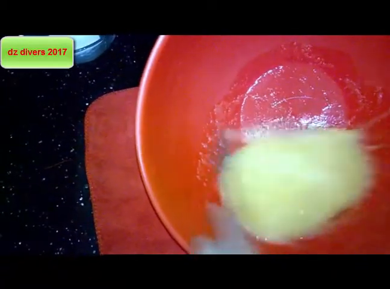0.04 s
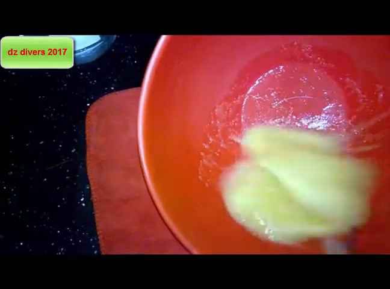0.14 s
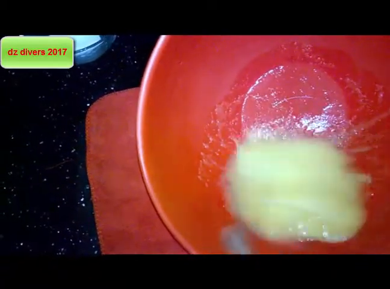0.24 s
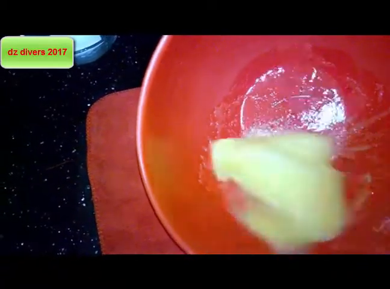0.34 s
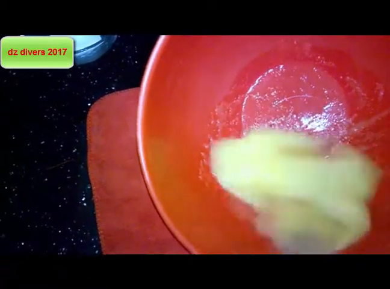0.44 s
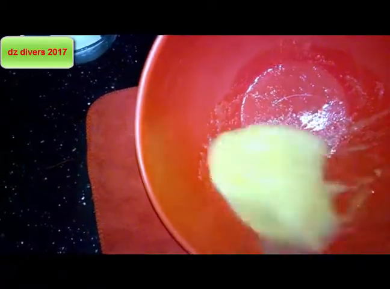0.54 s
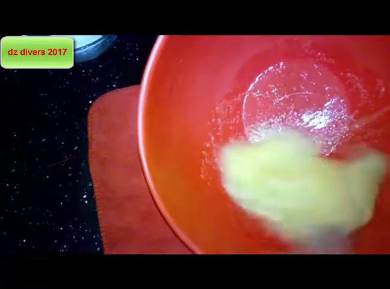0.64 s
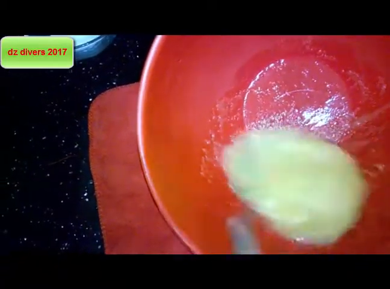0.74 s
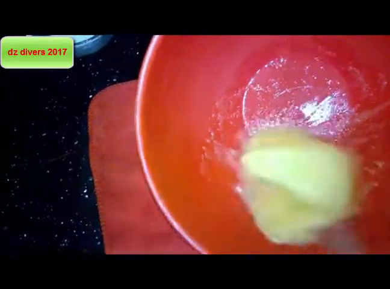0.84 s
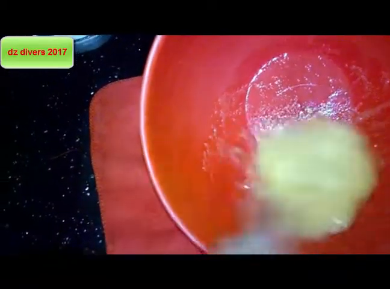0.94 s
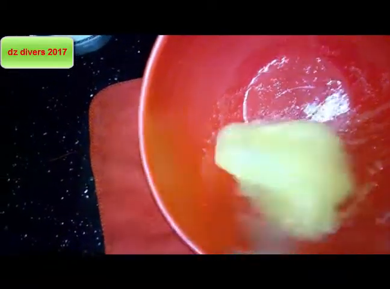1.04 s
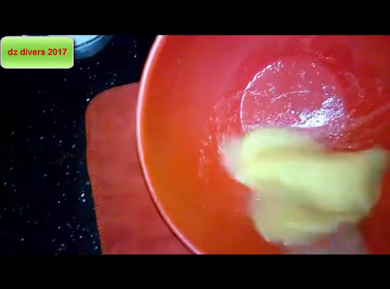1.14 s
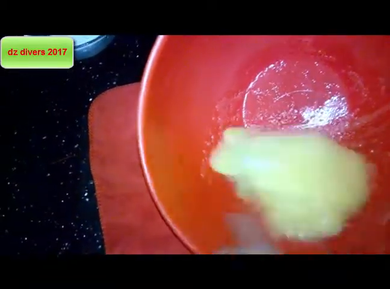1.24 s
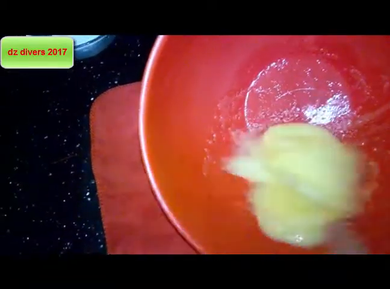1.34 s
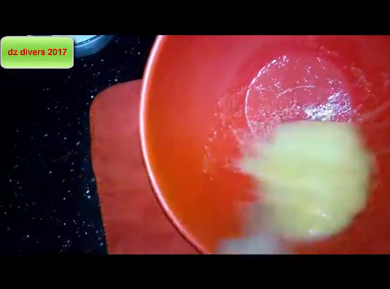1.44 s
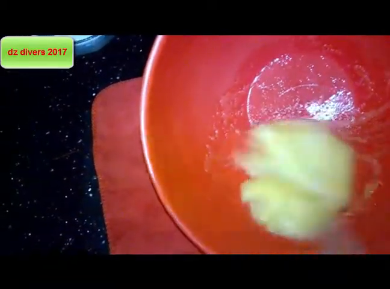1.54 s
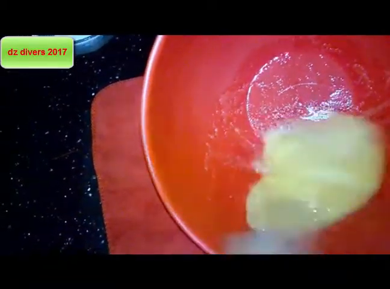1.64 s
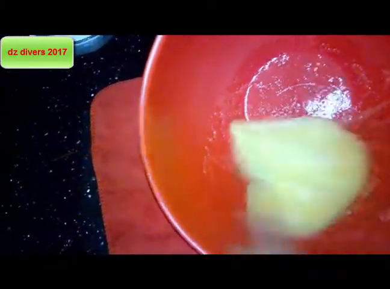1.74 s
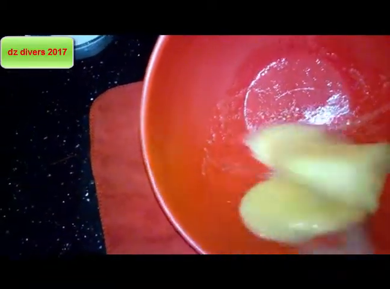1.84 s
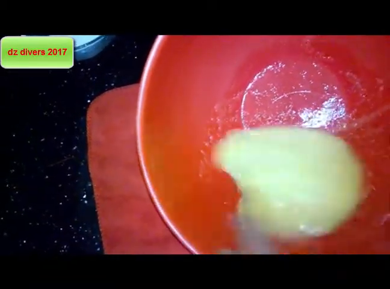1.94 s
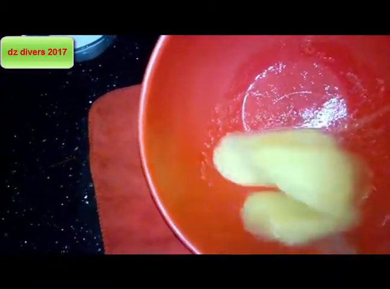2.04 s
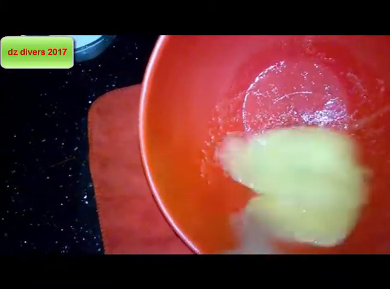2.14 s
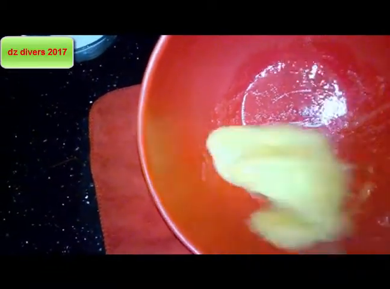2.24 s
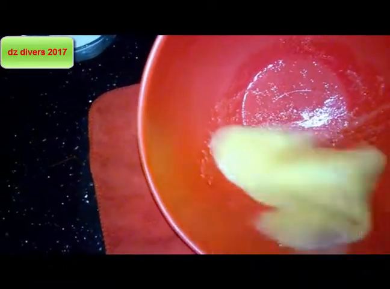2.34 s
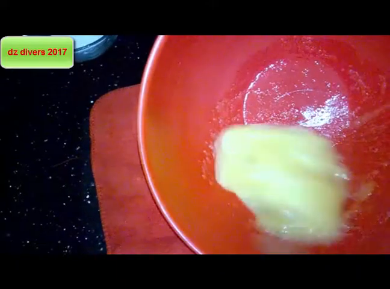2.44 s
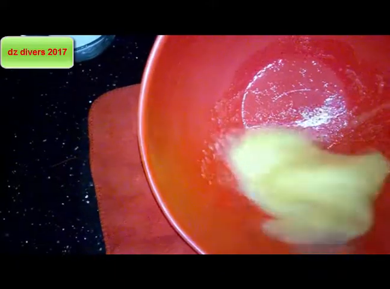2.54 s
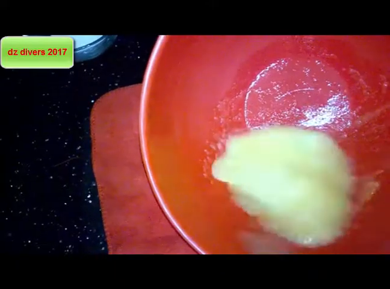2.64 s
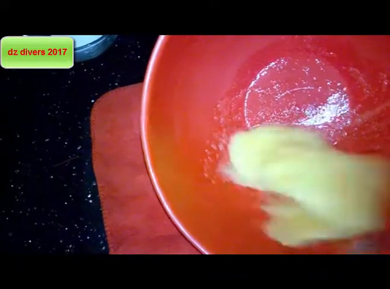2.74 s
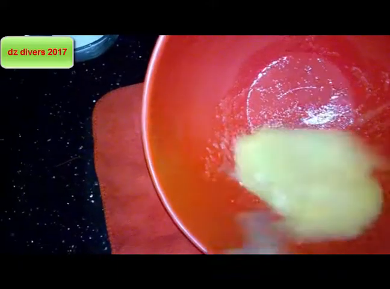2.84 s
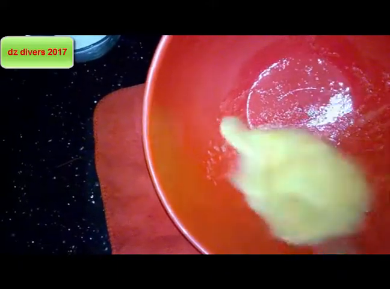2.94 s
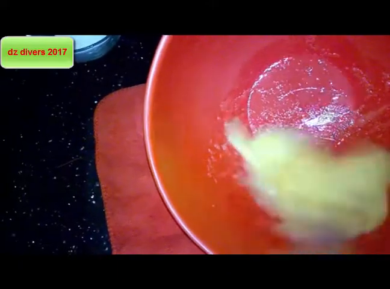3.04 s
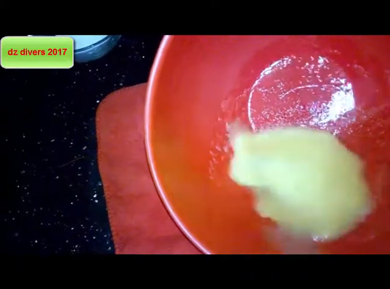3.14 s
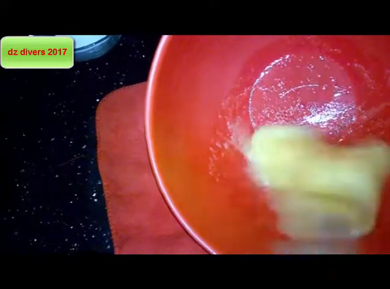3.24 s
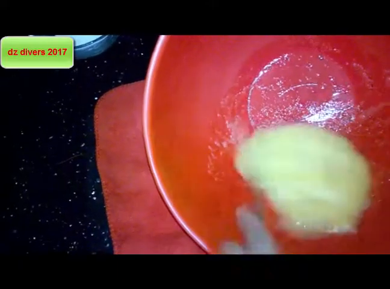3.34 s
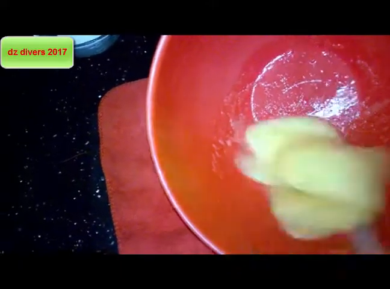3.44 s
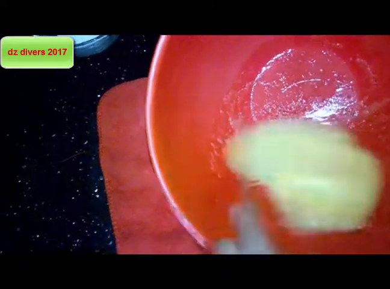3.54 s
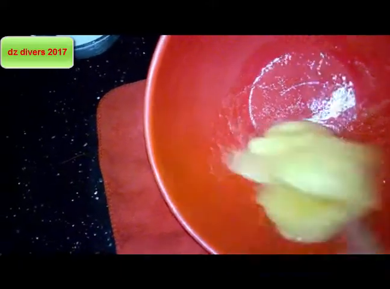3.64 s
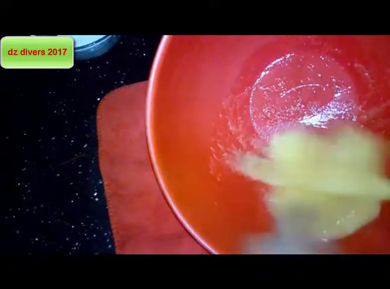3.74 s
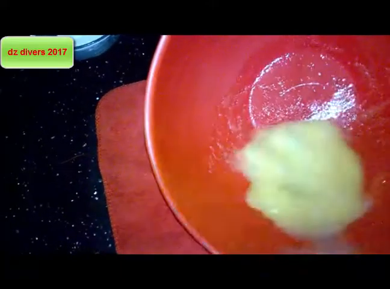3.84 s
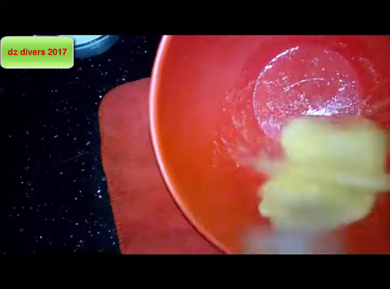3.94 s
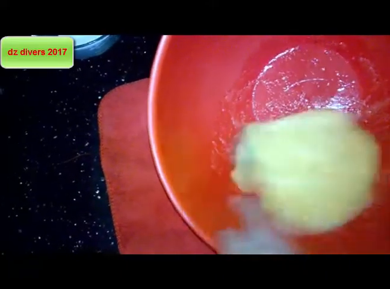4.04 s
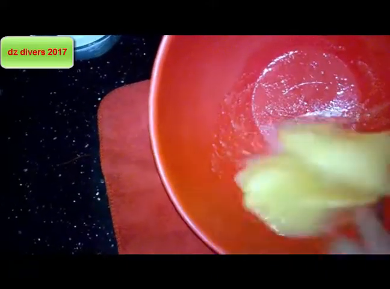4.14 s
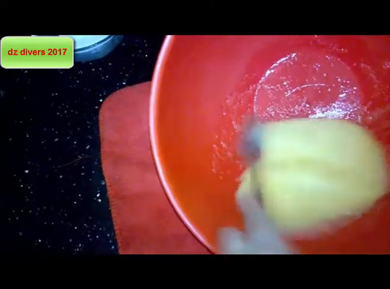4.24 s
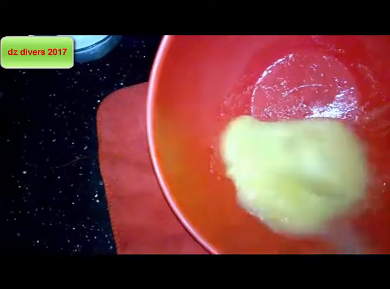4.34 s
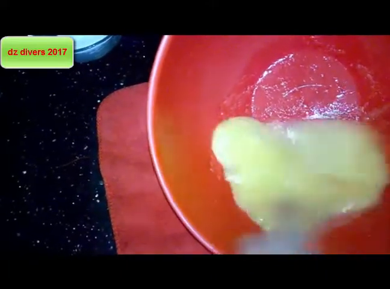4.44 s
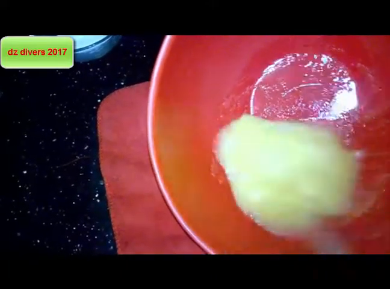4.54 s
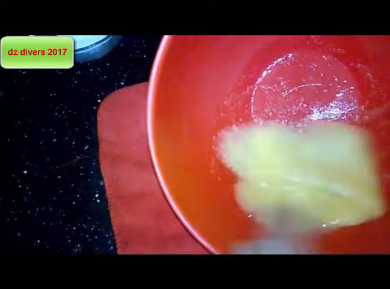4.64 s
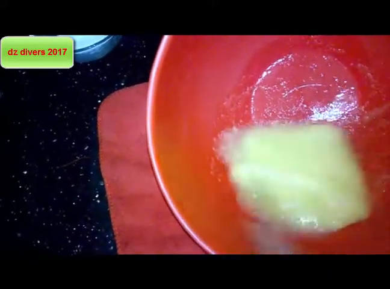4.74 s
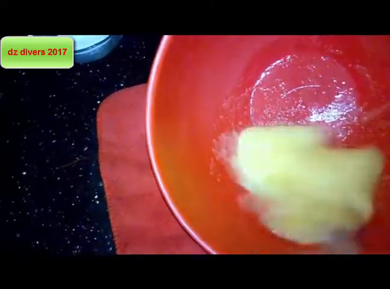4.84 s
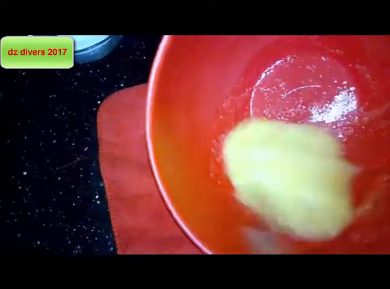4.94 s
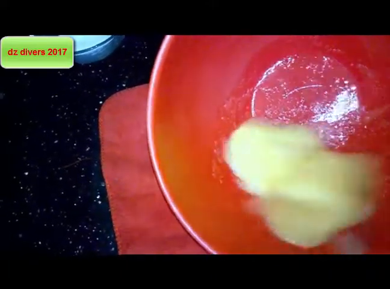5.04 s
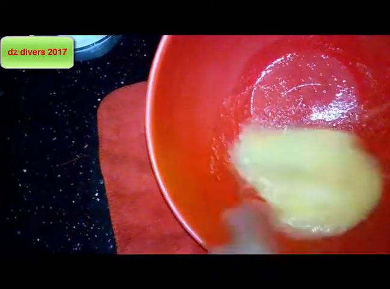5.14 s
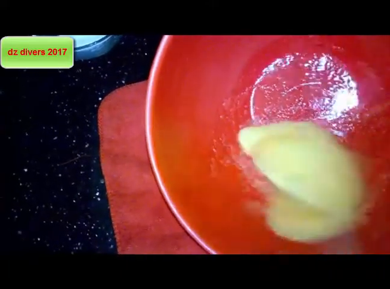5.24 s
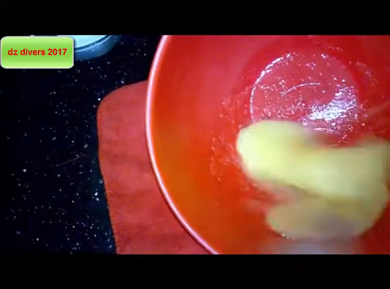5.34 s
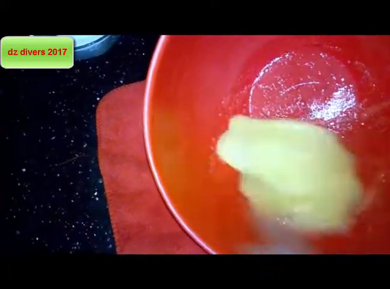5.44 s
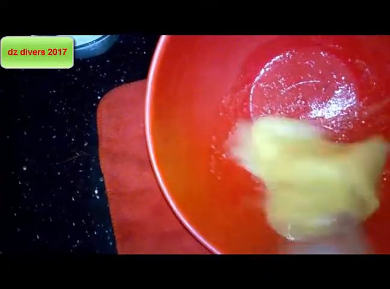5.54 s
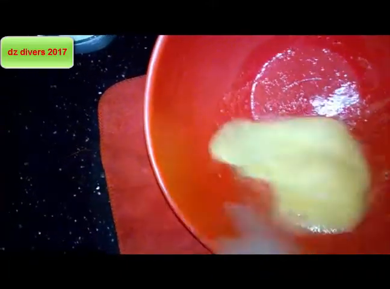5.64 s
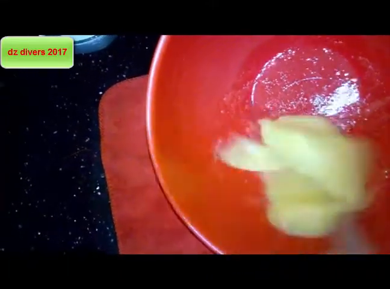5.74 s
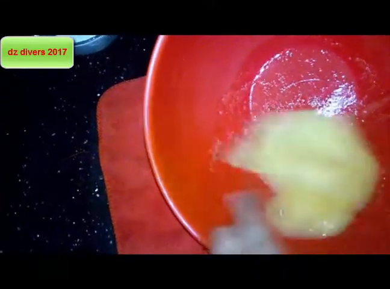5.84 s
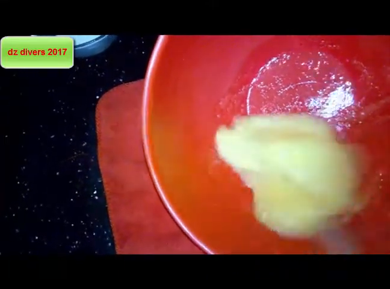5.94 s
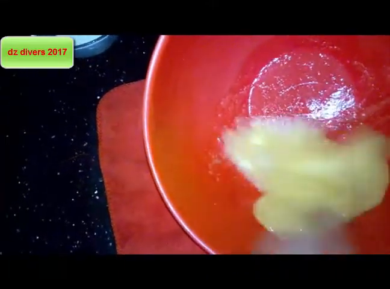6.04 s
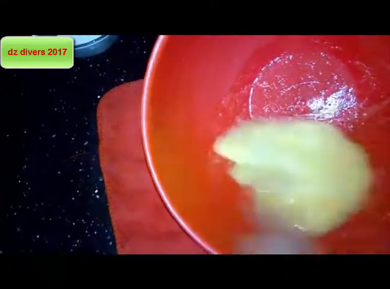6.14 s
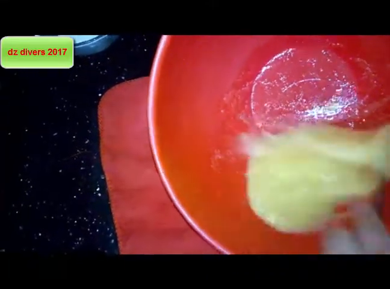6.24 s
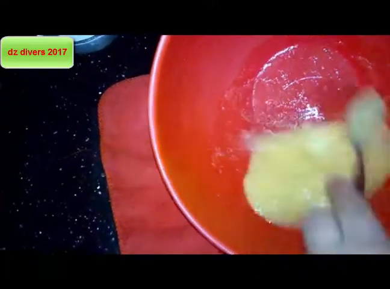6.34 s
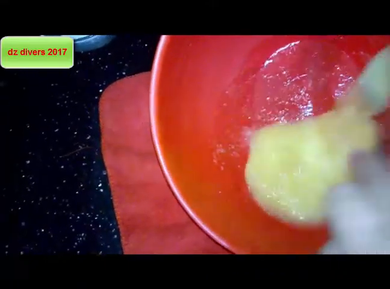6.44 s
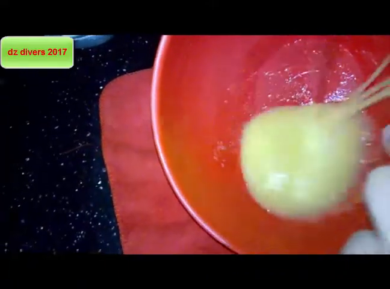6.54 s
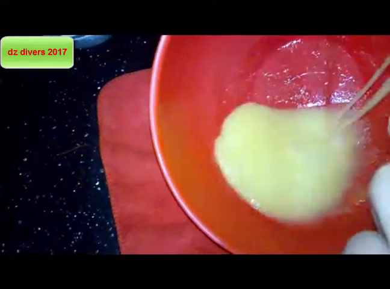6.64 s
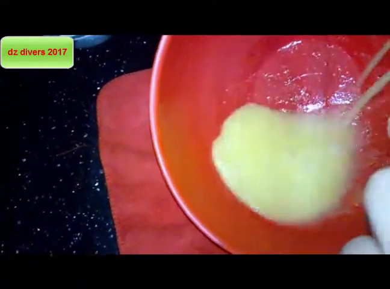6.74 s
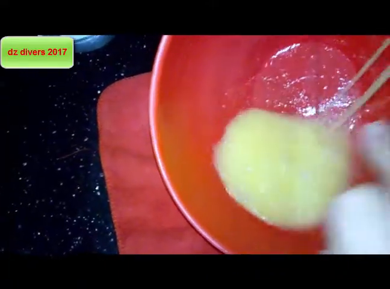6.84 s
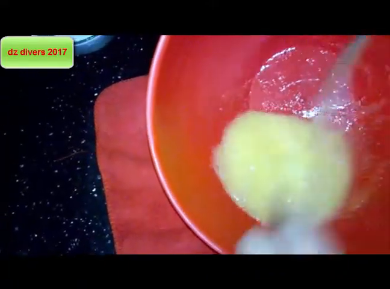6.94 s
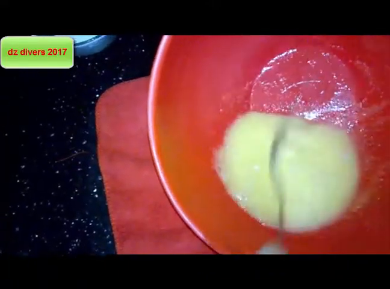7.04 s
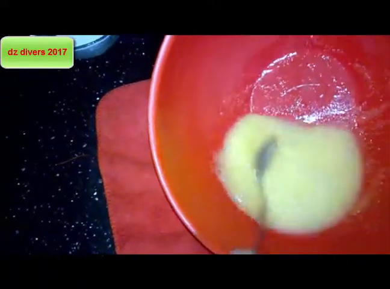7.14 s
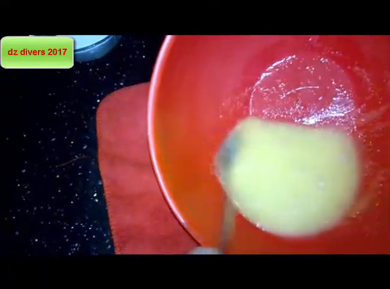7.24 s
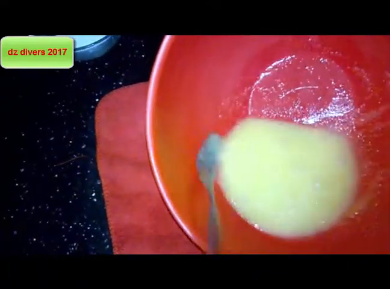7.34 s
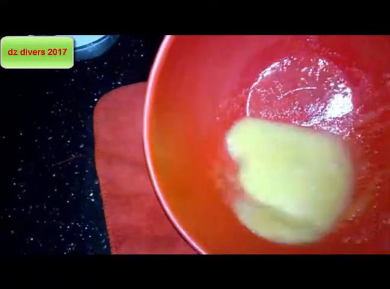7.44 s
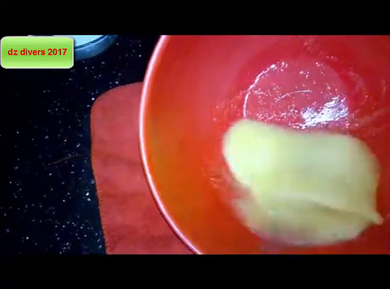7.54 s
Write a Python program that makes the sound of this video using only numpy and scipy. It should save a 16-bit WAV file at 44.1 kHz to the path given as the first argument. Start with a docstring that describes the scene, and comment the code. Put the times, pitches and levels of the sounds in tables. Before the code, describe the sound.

A fork or whisk beats wet egg and sugar in a plastic bowl, four quick scraping, clacking strokes a second, then a pause and one last stroke.

```python
"""A small hard kitchen: a fork-like whisk beats eggs and sugar in a tilted plastic bowl, about four
strokes a second, then a pause and one last stroke. Drags are noise bursts through grit colour and bowl
modes, with egg splashes as short chirps; knocks ring wall, rim and floor; the counter thumps as low modes.
Sparse decaying echoes answer over a faint noise hiss with thin steady whistles."""
import sys
import numpy as np
from scipy import signal
from scipy.fft import rfft, irfft
from scipy.io import wavfile
from scipy.ndimage import uniform_filter1d

SR = 44100
rng = np.random.default_rng(int(sys.argv[2]) if len(sys.argv) > 2 else 0)


def persist_wave(psi):
    """Save psi, clipped to +-1, as 16-bit WAV."""
    counts = np.round(np.clip(psi, -1, 1) * 32767).astype(np.int16)
    wavfile.write(sys.argv[1], SR, np.atleast_2d(counts).T)


N = 334719  # samples

# modes of the bowl's parts: (frequency [Hz], relative level [dB], nominal t60 [s])
WALL_MODES = [(253.4, -47.5, 0.01), (346.7, -5.5, 0.12), (384.3, -4, 0.039), (503.5, 17.5, 0.017),
              (489, 25, 0.0095), (680, 8, 0.036)]
RIM_MODES = [(832.6, -0.5, 0.016), (983.5, -0.1, 0.017), (1104, -3.4, 0.026), (1327, -2.6, 0.02)]
FLOOR_MODES = [(1500, -11, 0.035), (1554, -6.5, 0.094), (1629, 5.5, 0.018), (1647, -9, 0.0054),
               (1834, -20.5, 0.067)]
# colour of metal rubbing plastic: (frequency [Hz], relative density [dB per Hz])
GRIT_COLOUR = [(700, -27.5), (1200, -9.5), (1600, -2), (2100, 1.5), (2660, -4), (3000, -7), (3400, -9),
               (4220, -13.5), (6500, -23), (10500, -31), (15400, -36.5), (15900, -60.5)]


def gain_of(db):
    """Decibels to amplitude."""
    return 10 ** (np.asarray(db) / 20)


def evened(x):
    """Scales to rms 1."""
    return x / np.sqrt(np.mean(x ** 2) + 1e-20)


def read(points, hz):
    """Interpolates a curve on a log-frequency axis."""
    point_hz, value = np.transpose(points)
    return np.interp(np.log(hz + 1), np.log(point_hz + 1), value)


def add(mix, start_s, sound):
    """Mixes a sound in at a time."""
    part = mix[..., round(start_s * SR):][..., :sound.shape[-1]]
    part += sound[..., :part.shape[-1]]


def ring(modes, spread_db=0., low_hz=247.0, linger=1., size=6000):
    """Tap response: decaying sines reweighted by the touched spot; a high-pass limits the radiated bass."""
    hz, db, t60_s = np.transpose(modes)[:, :, None]
    t = np.arange(size) / SR
    spot_db = spread_db * rng.standard_normal(hz.shape)
    side = rng.choice([-1, 1], hz.shape) if spread_db else 1  # a spot lies on either side of each node
    envelope = gain_of(db + spot_db - 60 * t / (linger * t60_s))
    motion = (side * envelope * np.sin(2 * np.pi * hz * t)).sum(0)
    return signal.lfilter(*signal.butter(2, low_hz, "high", fs=SR), motion)


def tick():
    """Minimum-phase click: the grit colour released as early as causality allows."""
    colour_db = np.maximum(read(GRIT_COLOUR, np.fft.rfftfreq(4096, 1 / SR)), -100)
    half = np.log(gain_of(colour_db))
    log_gain = np.r_[half, half[-2:0:-1]]
    phase = -signal.hilbert(log_gain).imag
    return np.fft.ifft(np.exp(log_gain + 1j * phase)).real[:2048]


def scraping():
    """Sugar grains crack under the tines over a wet rub; the same force shakes each part of the bowl."""
    # (landing time [s], drag [s], grit level at landing, halfway and lift [dB],
    #  drive of wall and rim going in and of floor coming round, relative to grit [dB])
    strokes = [(0.0, 0.066, -35, -40.5, -38, 5.5, -4, 2), (.105, 0.086, -29, -30.5, -31, 1, -5, 4),
               (0.312, 0.13, -29.5, -27.5, -35.5, -8, -7, -2.5), (.546, 0.13, -42.5, -33, -31, 7.5, 11, -4),
               (.782, 0.14, -36.5, -32, -28.5, 2, -1.5, 1),
               (1.047, 0.12, -24, -34.5, -29, -3.5, -10.5, 4.5), (1.285, 0.12, -28.5, -28.5, -32, 3, -1, 8),
               (1.524, .13, -35, -29, -29.5, 2.5, -5.5, 3.5), (1.757, 0.11, -30.5, -32, -27, 5.5, -1.5, 4),
               (2.002, 0.1, -30.5, -34, -30.5, 3.5, -5, -10), (2.225, 0.12, -31, -29.5, -33, -4, -5, 2.5),
               (2.468, 0.1, -38.5, -31.5, -32.5, 5.5, -2, 1),
               (2.69, 0.11, -36, -32.5, -31, -3.5, -3.5, 7.5),
               (2.959, 0.082, -29.5, -32.5, -33.5, -1.5, -3, 5),
               (3.15, 0.11, -32.5, -31, -31.5, 2.5, -3.5, 5), (3.375, 0.13, -38.5, -31.5, -35, 0.5, -1, -6),
               (3.607, 0.12, -26, -28, -28.5, 2.5, -1.5, 3.5),
               (3.844, 0.12, -24.5, -30.5, -26.5, 4, -2.5, 0),
               (4.068, .12, -40.5, -30.5, -30.5, 11, 1, 5.5), (4.31, .11, -40.5, -28.5, -34, 4, -4.5, -3),
               (4.532, .11, -31.5, -35.5, -36, 7.5, -7, 7), (4.77, 0.096, -31.5, -32, -38, 1.5, 0.5, 2.5),
               (5.0, 0.087, -37, -29.5, -31, 3, -5, 2.5), (5.216, 0.11, -31, -29.5, -30, 2, -1, -4),
               (5.46, 0.12, -35, -29.5, -32.5, 1.5, -3.5, 7.5),
               (5.693, 0.11, -29, -29.5, -30.5, -3.5, -3.5, 4.5),
               (5.922, 0.11, -31.5, -28.5, -31, 4.5, -8, 4),
               (6.153, 0.12, -31.5, -28.5, -33.5, 3, -4.5, -5), (7.358, 0.16, -33, -38.5, -30, 2.5, 6, -7)]
    t, drive = np.arange(N) / SR, np.zeros((4, N))
    for landing_s, *row in strokes:
        add(drive, landing_s, stroke(*row))

    cracks_per_s, crunch_s = 700, 0.00047
    grain_db = 3.0 * np.minimum(rng.exponential(1, N), 5)
    grains = gain_of(grain_db) * (rng.random(N) < cracks_per_s / SR)
    puffs = signal.oaconvolve(grains, np.exp(-t[:400] / crunch_s))[:N]
    chatter = gain_of(1.3 * evened(uniform_filter1d(rng.standard_normal(N), 350)))  # the tines skip
    wet_rub = 2.6
    force = evened(chatter * (wet_rub + evened(puffs)) * rng.standard_normal(N))

    bodies = [tick(), ring(WALL_MODES), ring(RIM_MODES, low_hz=700.0), ring(FLOOR_MODES, low_hz=980.0)]
    rub = np.zeros(N)
    for gain, body in zip(drive, bodies):
        rub += signal.oaconvolve(force * gain, body / np.linalg.norm(body))[:N]
    return sloshed(rub, patchy_db=4.0) + gain_of(-3.0) * splashes(drive[0])


def stroke(drag_s, land_db, half_db, lift_db, wall_db, rim_db, floor_db):
    """Drive of grit, wall, rim and floor as the tines drag from wall to floor, lift and trail off."""
    trail_s, lift_fade_s, lift_drop_db = 0.17, 0.024, -16
    turn, turn_width = 0.63, 0.21  # passage from wall to floor, share of the drag
    wall_late_db, rim_late_db, floor_early_db = -13, -10, -7.5  # parts that are not touched
    wall_trail_db, floor_trail_db = 2, -8  # egg slides back off the wall, settles on the floor and damps it

    t = np.arange(0, drag_s + trail_s, 1 / SR)
    lifted = 1 - np.exp(-np.maximum(t - drag_s, 0) / lift_fade_s)
    turned = .5 + .5 * np.tanh((t / drag_s - turn) / turn_width)
    grit_db = np.interp(t, [0, drag_s / 2, drag_s], [land_db, half_db, lift_db])
    grit_db = grit_db + lift_drop_db * lifted
    wall_db = wall_db + (wall_late_db - wall_db) * turned + wall_trail_db * lifted
    rim_db = rim_db + (rim_late_db - rim_db) * turned
    floor_db = floor_early_db + (floor_db - floor_early_db) * turned + floor_trail_db * lifted
    ending = np.minimum((t[-1] - t) / .03, 1)
    return ending * gain_of(grit_db + np.array([0 * t, wall_db, rim_db, floor_db]))


def sloshed(x, patchy_db):
    """Egg slides over the wall and damps now one range of pitches, now another."""
    z = signal.stft(x, nperseg=512, noverlap=384)[2]
    patches = rng.standard_normal(z.shape[::-1]).T
    patches = uniform_filter1d(patches, size=6, axis=0)  # across pitch
    patches = evened(uniform_filter1d(patches, size=9, axis=1))  # across time
    return signal.istft(z * gain_of(patchy_db * patches), nperseg=512, noverlap=384)[1][:N]


def splashes(level):
    """Small slaps and bubbles in the egg, each a few cycles at its own rising pitch."""
    splashes_per_s, pitches = 1400, 24
    size_db = 4.5 * np.minimum(rng.exponential(1, N), 4)
    size = level * gain_of(size_db) * (rng.random(N) < splashes_per_s / SR)
    kind, out = rng.integers(0, pitches, N), np.zeros(N)
    for k, hz in enumerate(np.geomspace(1000., 7000., pitches)):
        cycles = np.arange(0, 24, hz / SR)
        rising = np.sin(2 * np.pi * cycles * (1 + 0.0076 * cycles))
        grain = cycles * np.exp(-cycles / 1.9) * rising
        weight = gain_of(read(GRIT_COLOUR, hz)) * np.sqrt(hz)
        out += signal.oaconvolve(size * (kind == k), weight * grain / np.linalg.norm(grain))[:N]
    return out * np.linalg.norm(level) / np.linalg.norm(out)


def hush():
    """Steady hiss as coloured noise, with thin high whistles whose phase wavers slightly."""
    # (frequency [Hz], relative density [dB per Hz]); the last row ends the band
    hiss_colour = [(25, 0), (48, 8), (90, -2), (350, -3), (900, -7), (2300, -7), (3300, -13), (6200, -13),
                   (7200, -16), (15650, -17.5)]
    # (frequency [Hz], relative level [dB])
    whistles = [(8726, -87), (9911, -84), (12236, -85), (13421, -78), (14729, -86)]
    hz, t = np.fft.rfftfreq(N, 1 / SR), np.arange(N) / SR
    colour = gain_of(read(hiss_colour, hz)) * (hz < hiss_colour[-1][0])
    hiss = irfft(rfft(rng.standard_normal(N)) * colour, N)
    out = gain_of(-58.5) * evened(hiss)
    for whistle_hz, db in whistles:
        drift_rad = 1.2 * evened(uniform_filter1d(rng.standard_normal(N), 900))
        out = out + np.sqrt(2) * gain_of(db) * np.sin(2 * np.pi * whistle_hz * t + drift_rad)
    return out


def kitchen(x):
    """The room's echo: a steady crossfade among four random echo patterns keeps its colour changing."""
    turn_hz = 2.3
    turn = 2 * np.pi * turn_hz * np.arange(N) / SR
    out = np.zeros(N)
    for k in range(4):
        share = np.maximum(np.cos(turn / 2 - k * np.pi / 2), 0)
        out += signal.fftconvolve(x * share, echoes())[:N]
    return out


def echoes():
    """Sparse taps of random sign, one in every 20 samples, each band dying at its own speed."""
    # decay of the room: (frequency [Hz], t60 [s])
    room_decay = [(200, 0.35), (530, 0.51), (1390, 0.47), (3680, 0.33), (9700, 0.32)]
    taps = np.zeros(SR)
    at = np.arange(260, SR - 20, 20)
    taps[at + rng.integers(0, 20, len(at))] = rng.choice([-1., 1.], len(at))
    hz, t, z = signal.stft(taps, SR, nperseg=256)
    decay = gain_of(-60 * t / read(room_decay, hz)[:, None])
    tail = signal.istft(z * decay, SR, nperseg=256)[1]
    return tail / np.linalg.norm(tail)


def knocks():
    """Each blow is a short rattle of the tines, then the parts of the bowl ring out."""
    # (time [s], click level [dB], wall, rim and floor levels relative to the click [dB])
    blows = [(0.0636, -21, 4, 2.5, 1.5), (0.1088, -19.5, -6, -10.5, -21), (0.153, -13.5, -11.5, -5, -31),
             (0.188, -23, -17, -9, 6), (0.311, -14, -13.5, -41, -36), (0.3268, -7.5, -21.5, -14.5, -51),
             (0.378, -8.5, -20, -20, -27), (0.3602, -16.5, -1.5, -22, -38.5),
             (0.5454, -7.5, -6, -4.5, -11.5), (0.6011, -21, -11.5, -3, -3), (0.6399, -9.5, -42, -42, 1),
             (0.7926, -11, -8, -5, -8.5), (0.8182, -15.5, 8, -8, -10.5), (0.867, -30, -23, 14, -19),
             (0.8972, -18, -9, -8, 10.5), (0.9719, -34.5, 24.5, 9, -15), (1.0485, -3, -5, -24, -16),
             (1.0655, -18.5, -3, 2, -10), (1.0951, -11, -6, -9, -14), (1.1414, -13, -42, -22.5, 5.5),
             (1.2244, -20.5, 10, -1, -13), (1.286, -16, 10, 2.5, -11), (1.4624, -33.5, 2, 16.5, -23),
             (1.5242, -7, -5, -5.5, -7.5), (1.5602, -28.5, 17.5, 4, -35), (1.5856, -17, -5, -19.5, 6),
             (1.7567, -14, -3.5, -2, 0), (1.8551, -7, -34, -11, -0.5), (1.872, -3, -41, -23, -15),
             (2.0048, -9.5, 4.5, -2, -7.5), (2.034, -17, 8, -1, -5), (2.0935, -26, -24, -18, 16.5),
             (2.1097, -24, 9, -20, 9), (2.2251, -10.5, 4.5, -12, -33), (2.2341, -14, -0.5, -25, -3.5),
             (2.297, -14, -31, 3, -12), (2.407, -21, -29, -10.5, -11), (2.445, -16, -9, -7, -3),
             (2.472, -20, -21.5, -8, -4), (2.5086, -11.5, 4.5, 5, -3), (2.6809, -12, -22, -10, -30),
             (2.7011, -13.5, -11, -9, -16), (2.7286, -16.5, -2, -5.5, -16), (2.7568, -16, -24, 0, -27),
             (2.774, -19.5, -5.5, -4, 2.5), (2.8033, -29, -10, -22, 18), (2.9147, -19.5, -7.5, -14, 3),
             (2.9602, -13.5, -21, -9.5, -7), (3.044, -25.5, -20, -11, 3.5), (3.0692, -21, 7.5, 8, -25),
             (3.1494, -15, -6, -14.5, -22), (3.2455, -21.5, -43, -8, 5), (3.3802, -20.5, 5.5, -3, -23.5),
             (3.4029, -27, 11, -3, -10.5), (3.4527, -14.5, 3.5, -8, 0.5), (3.4873, -19, -35, -25, 6),
             (3.494, -25, -26.5, -18.5, 7.5), (3.593, -22.5, 7.5, -2.5, -6), (3.6065, -4.5, -17, -7, -24.5),
             (3.6513, -19, -23, 1, -3.5), (3.7922, -18, 10, 4, -28), (3.8461, -16.5, 6.5, 0, -13.5),
             (3.905, -16.5, 4, -19.5, 0.5), (3.9148, -4.5, -14.5, -17.5, -12.5),
             (3.925, -17, -22, -14.5, 12.5), (3.981, -15.5, 0.5, -16, -17), (4.0643, -23, 18, 2, -7.5),
             (4.095, -27, 12.5, 14.5, 14.5), (4.1312, -28, 22.5, -3, 13), (4.153, -7.5, 0.5, 0.5, -33.5),
             (4.3072, -11.5, 5.5, 1.5, 1.5), (4.3562, -6, -3, -32.5, -28.5), (4.4041, -11, -28, -44, 3),
             (4.5304, -5.5, 7, -6.5, -13), (4.7896, -20.5, 7, 0, -3), (4.8674, -22, -37, -25, 3),
             (4.962, -24.5, 3, -1.5, -18), (5.213, -2, -30, -25, -36.5), (5.2505, -18.5, -33, 3, 3),
             (5.3208, -22, -33, -34, 11), (5.396, -23, 12, 4, -43), (5.4677, -24, -29, 0, -2),
             (5.4899, -24.5, -1, 4.5, -0.5), (5.678, -24, 1.5, -11, -11), (5.695, -12, -9, -8, -4.5),
             (5.728, -36, 22.5, 1, -18.5), (5.7705, -16, -34, -21, 6), (5.786, -17, -26, -21, 10),
             (5.9235, -8, -18, -11.5, -28), (6.003, -14, -11.5, -24.5, 2), (6.014, -18, -23, -18, 7.5),
             (6.1515, -12.5, 3.5, -13, -31.5), (6.2213, -23.5, 14, -32, 12.5),
             (6.2398, -7, -32, -35, -10.5), (6.2565, -10.5, -35, -36, 5), (6.2728, -26.5, -2.5, -24, 14),
             (7.0773, -39, -9, -13, -2), (7.349, -14.5, -18, -37, -15), (7.3604, -20.5, -20, 0, -1),
             (7.434, -25, -14, 3, 10), (7.4497, -15, 1.5, -8, -8), (7.4702, -17, -29, -2.5, 2)]
    # modes of the tines: (frequency [Hz], relative level [dB], t60 [s])
    tine_modes = [(2933, 10, 0.01), (4056, 1, 0.011), (3998, 8.5, 0.0073), (5150, -1, 0.0069),
                  (5730, -32, 0.031)]
    crests_db = (4, 0, 3.5, 2.5)  # click, wall, rim, floor
    out, click, t = np.zeros(N), tick(), np.arange(600) / SR
    for start_s, click_db, *parts_db in blows:
        give_s = 0.00014 * gain_of(0.18 * parts_db[0])  # blows cushioned by egg are duller and last longer
        push = (t / give_s) ** 3 * np.exp(-t / give_s)
        rattle = rng.standard_normal(len(t)) * np.exp(-t / 0.0025)
        rattle[0] += 4.5  # extra weight on the first tine's landing
        skid = rng.standard_normal(len(t)) * t * np.exp(-t / 0.0015)  # the tines slide on after landing

        tines = ring(tine_modes, spread_db=6.0, low_hz=1953.0, size=len(click))
        clink = evened(click) + 0.56 * evened(tines)
        wall = ring(WALL_MODES, spread_db=3.0, linger=1.52)
        rim = ring(RIM_MODES, spread_db=1.0, low_hz=584.0, linger=0.81)
        floor = ring(FLOOR_MODES, spread_db=4.5, low_hz=1190.0, linger=0.64)
        pairs = [(rattle, clink), (push, wall), (rattle, rim), (skid, floor)]
        for (force, body), db, crest_db in zip(pairs, [0] + parts_db, crests_db):
            sound = np.convolve(force, body)
            add(out, start_s, gain_of(click_db + db + crest_db) * sound / abs(sound).max())
    return out


def counter():
    """The bowl bumps the counter: low modes under a push that swells over a few milliseconds."""
    # (time [s], level [dB])
    bumps = [(0.109, -46), (0.328, -30), (0.558, -40), (0.797, -25.5), (1.059, -26), (1.288, -27.5),
             (1.531, -32), (1.77, -30.5), (2.009, -39), (2.23, -33), (2.509, -42.5), (2.7, -47),
             (2.959, -34), (3.157, -28), (3.4, -31.5), (3.609, -26), (3.848, -31), (4.099, -30),
             (4.347, -27.5), (4.531, -31), (4.789, -39), (4.999, -35), (5.218, -34.5), (5.468, -36),
             (5.698, -29), (5.929, -30), (6.159, -26), (7.359, -34)]
    # modes of the counter: (frequency [Hz], relative level [dB], t60 [s])
    counter_modes = [(48, 9.5, .12), (69, 3.5, 0.16), (116.3, 10.5, 0.083), (180, -5.5, .07)]
    out = np.zeros(N)
    for start_s, db in bumps:
        body = ring(counter_modes, spread_db=1.5, low_hz=41.6, size=9000)
        thump = np.convolve(np.hanning(300), body)
        add(out, start_s, gain_of(db) * thump / abs(thump).max())
    return out


def scene():
    """Whisk and bowl close by, the kitchen behind them."""
    bowl = gain_of(2.5) * scraping() + knocks()
    return (bowl + counter() + gain_of(-7.0) * kitchen(bowl) + hush())[None]


def record(dry):
    """The loudest blows meet a soft ceiling; then a low-pass limits the band."""
    edge_hz = 16800
    soft = 1.214 * np.tanh(dry / 1.397)
    low_pass = signal.firwin(511, edge_hz, window=("kaiser", 9), fs=SR)
    return signal.oaconvolve(soft, low_pass[None], "same")


dry = scene()
out = record(dry)
persist_wave(out)
```